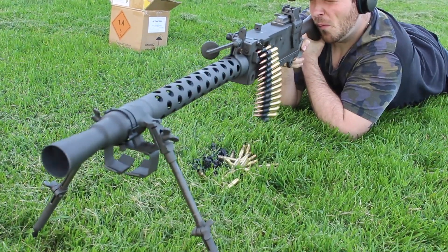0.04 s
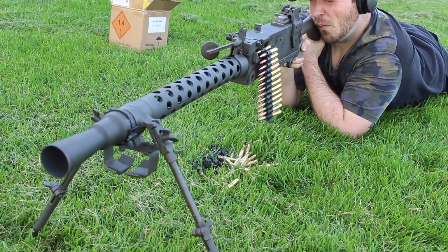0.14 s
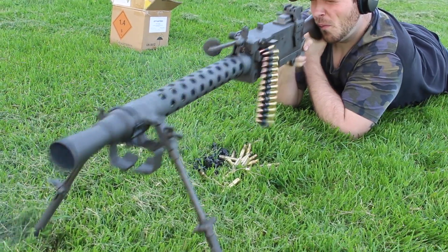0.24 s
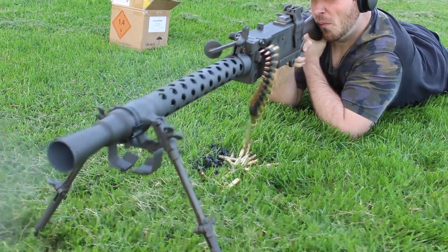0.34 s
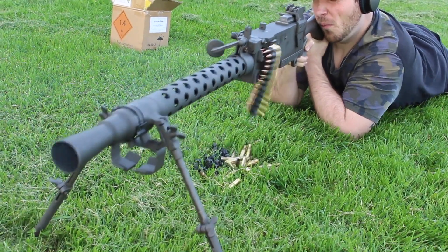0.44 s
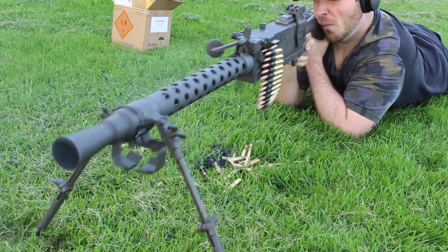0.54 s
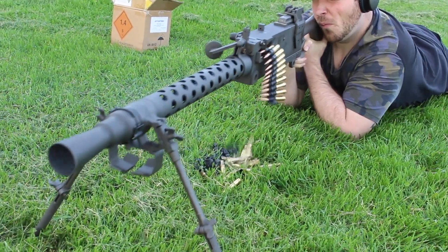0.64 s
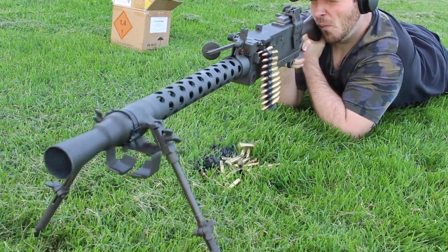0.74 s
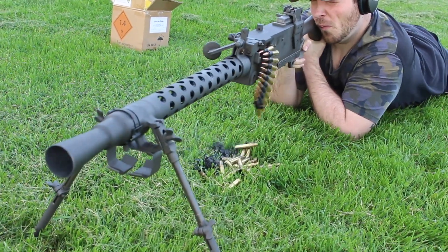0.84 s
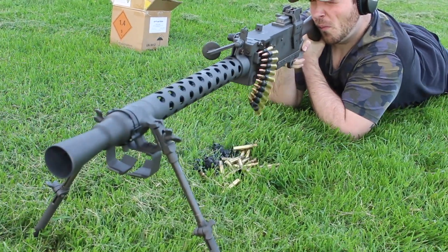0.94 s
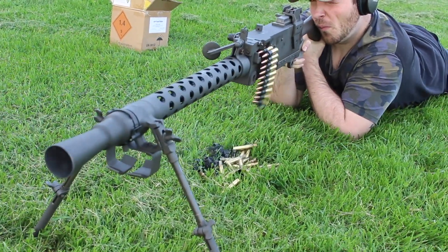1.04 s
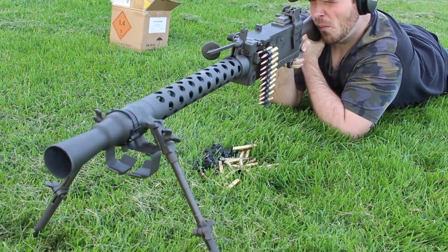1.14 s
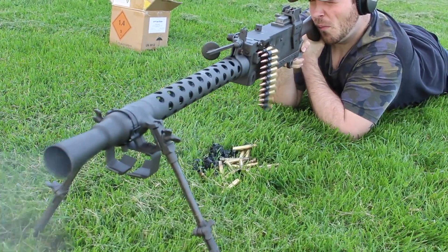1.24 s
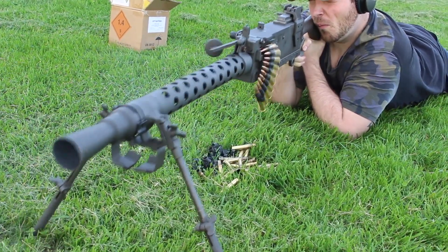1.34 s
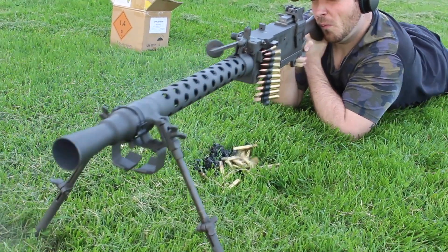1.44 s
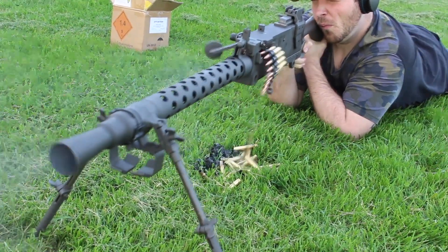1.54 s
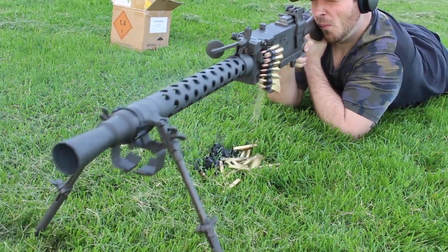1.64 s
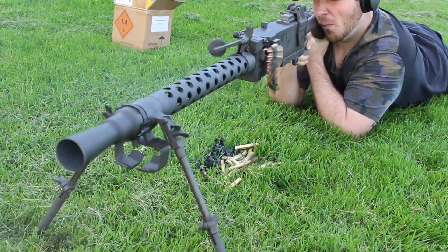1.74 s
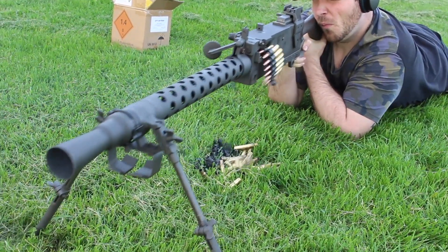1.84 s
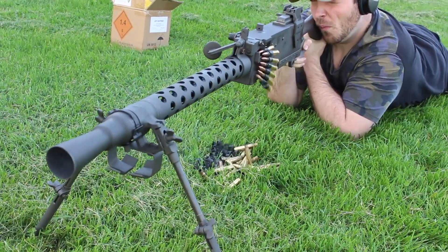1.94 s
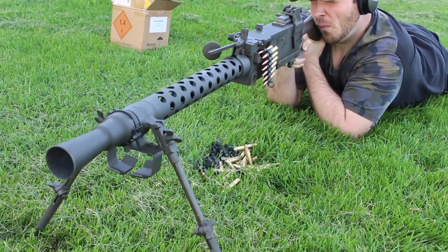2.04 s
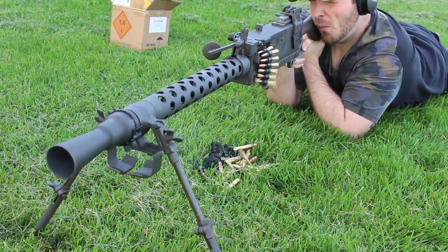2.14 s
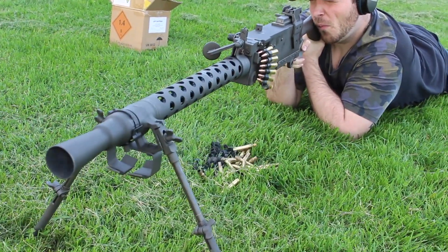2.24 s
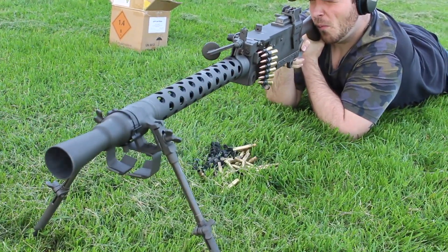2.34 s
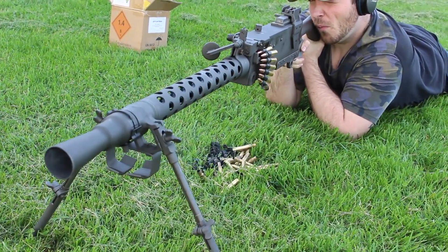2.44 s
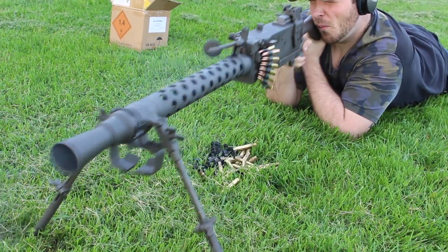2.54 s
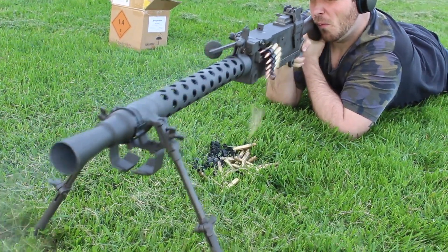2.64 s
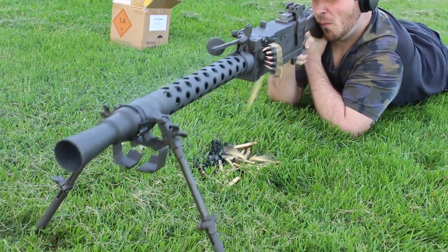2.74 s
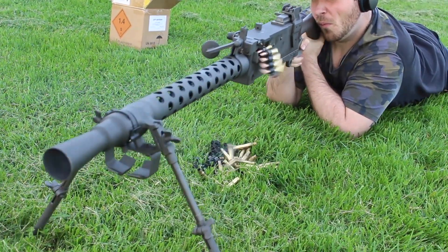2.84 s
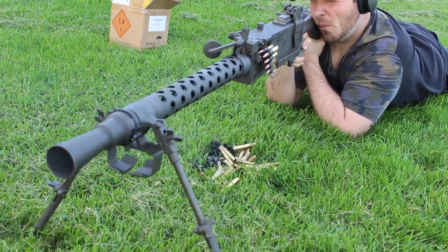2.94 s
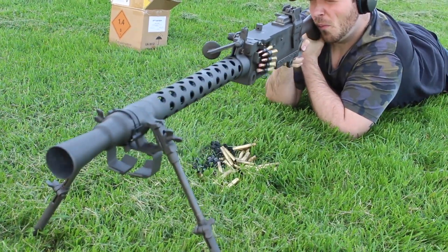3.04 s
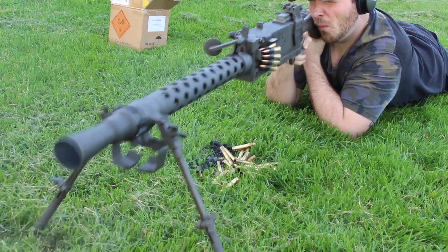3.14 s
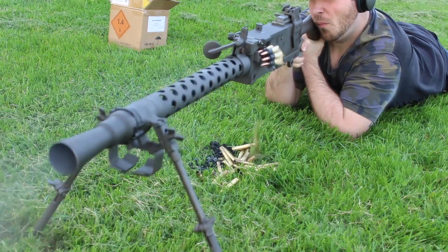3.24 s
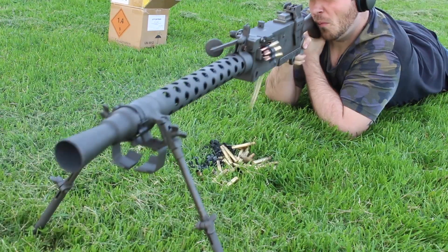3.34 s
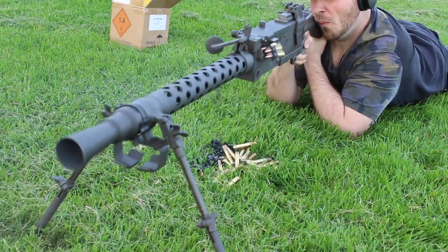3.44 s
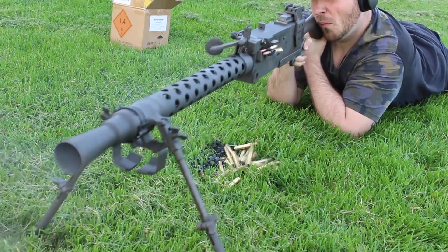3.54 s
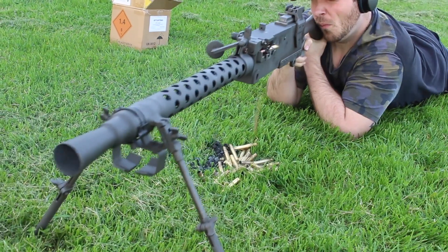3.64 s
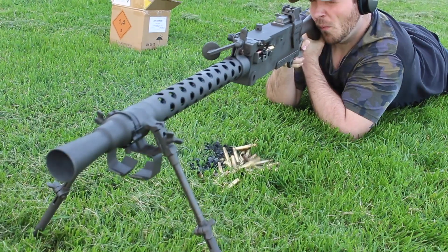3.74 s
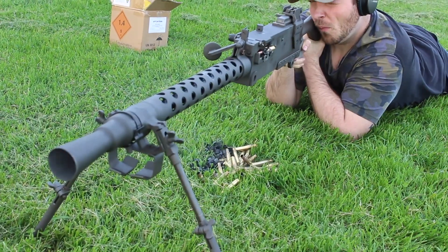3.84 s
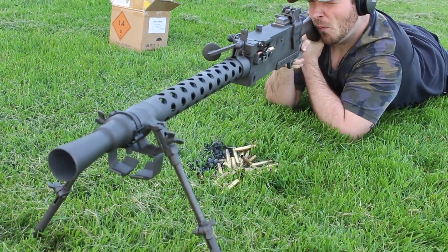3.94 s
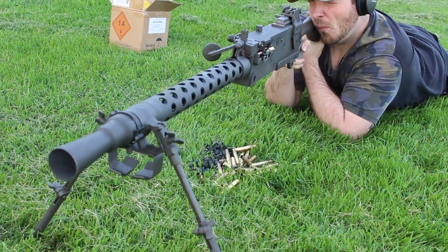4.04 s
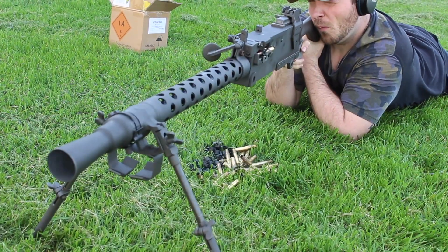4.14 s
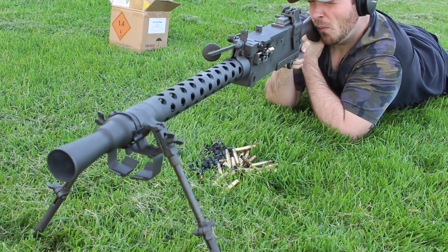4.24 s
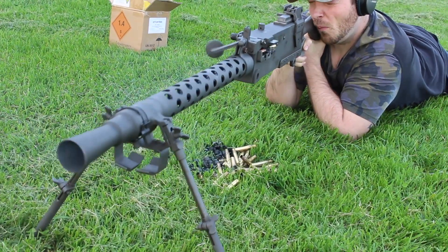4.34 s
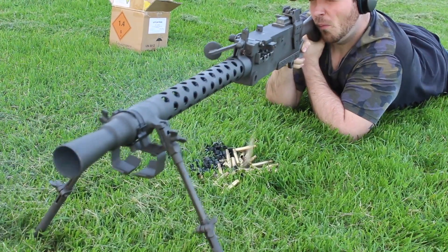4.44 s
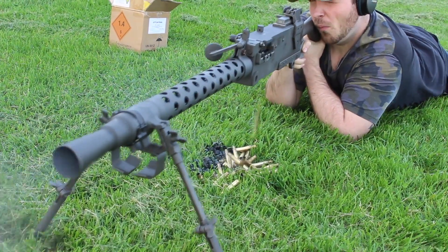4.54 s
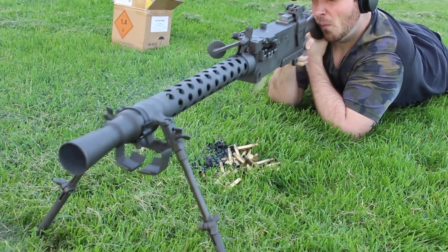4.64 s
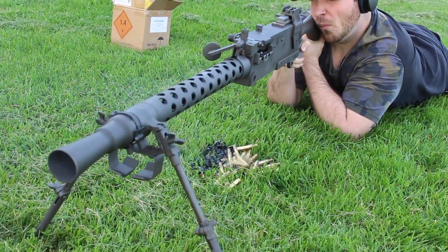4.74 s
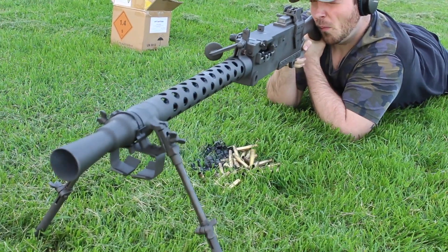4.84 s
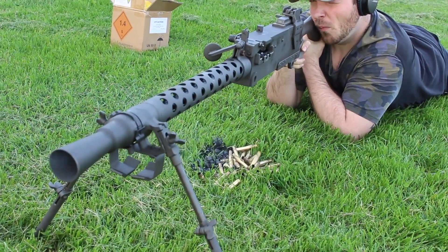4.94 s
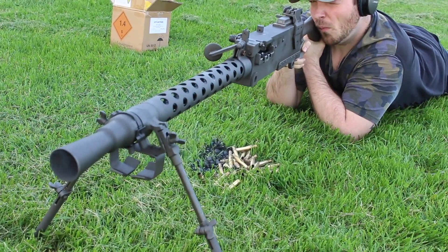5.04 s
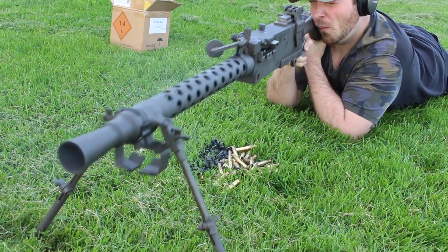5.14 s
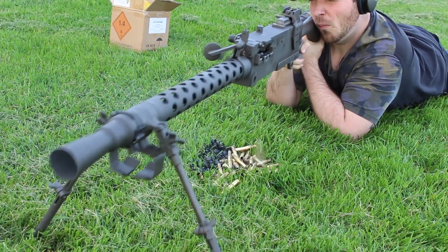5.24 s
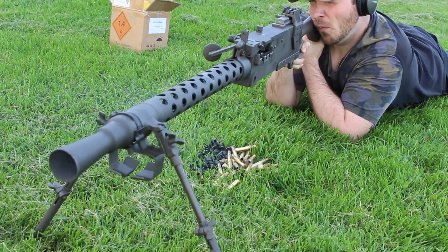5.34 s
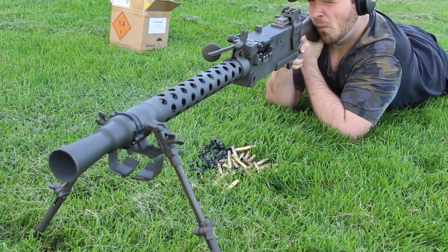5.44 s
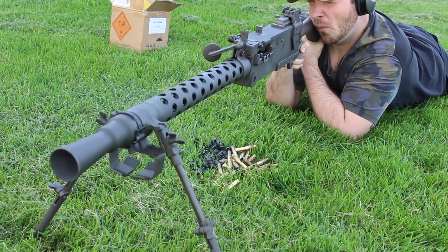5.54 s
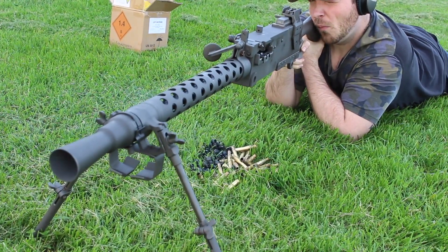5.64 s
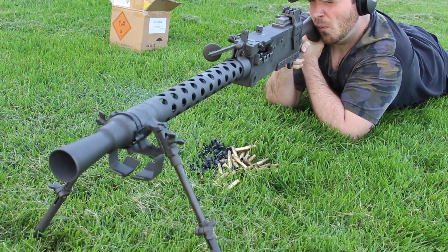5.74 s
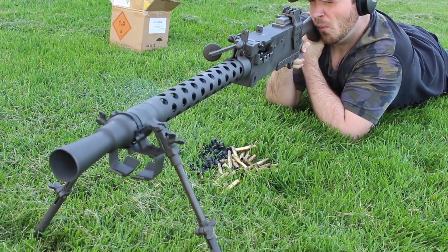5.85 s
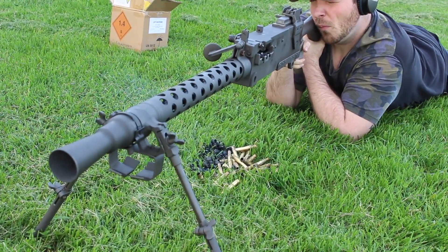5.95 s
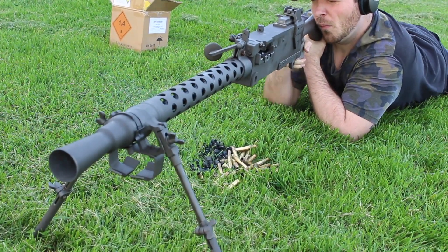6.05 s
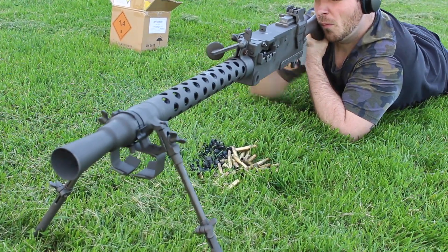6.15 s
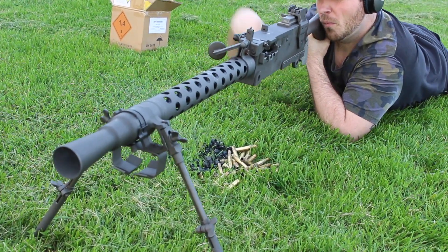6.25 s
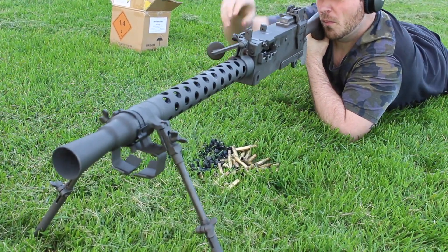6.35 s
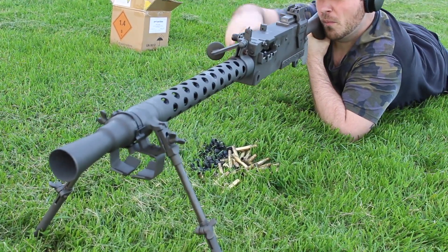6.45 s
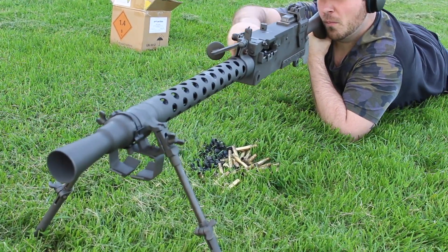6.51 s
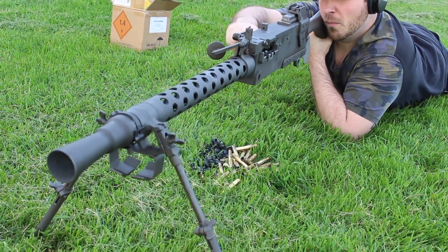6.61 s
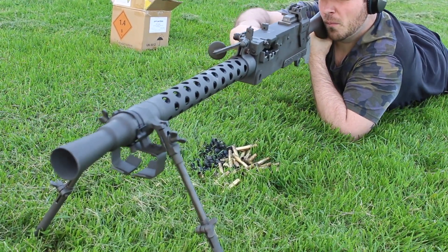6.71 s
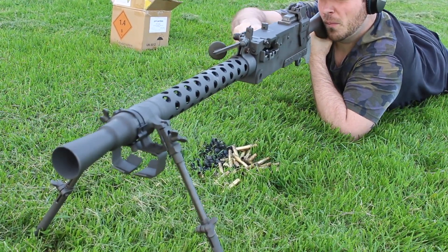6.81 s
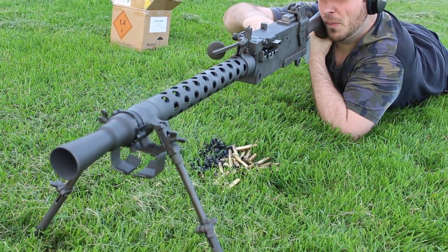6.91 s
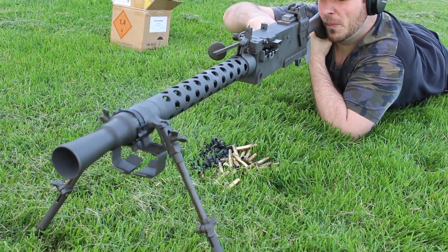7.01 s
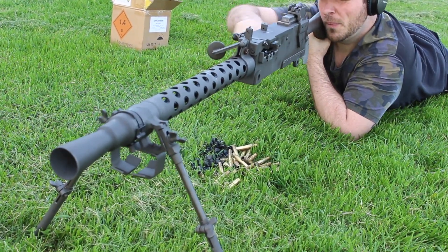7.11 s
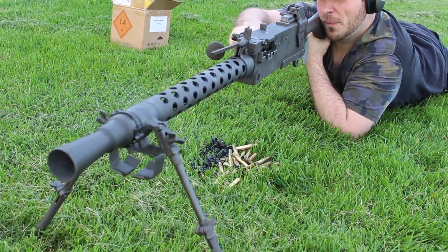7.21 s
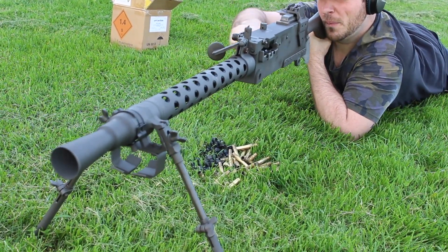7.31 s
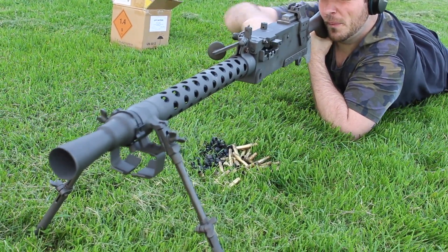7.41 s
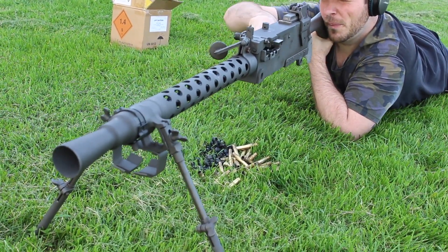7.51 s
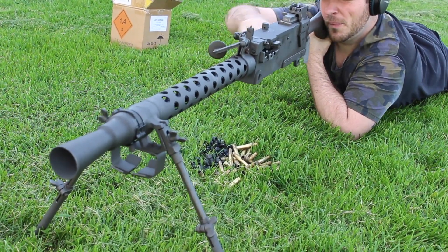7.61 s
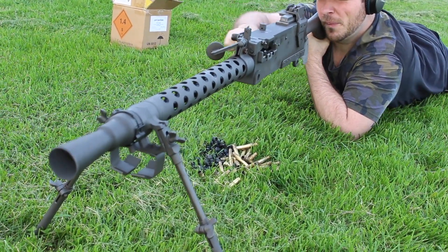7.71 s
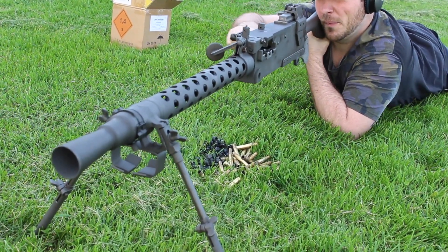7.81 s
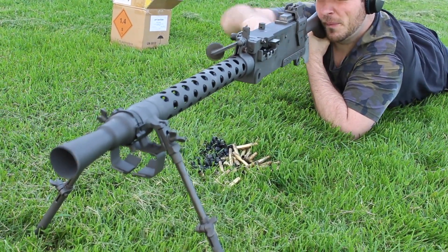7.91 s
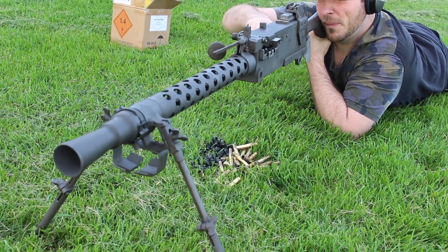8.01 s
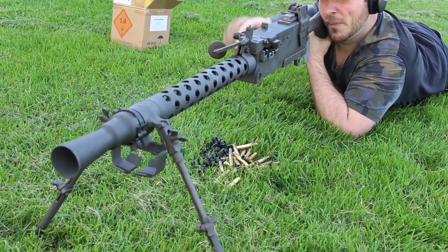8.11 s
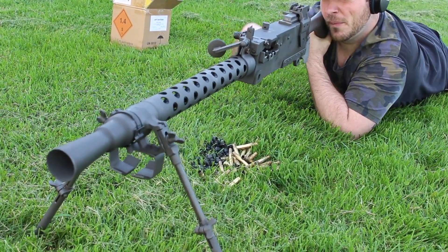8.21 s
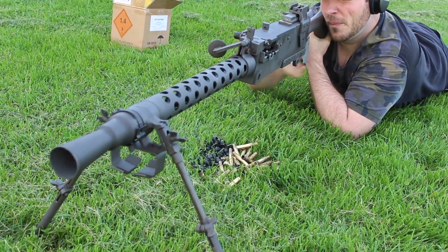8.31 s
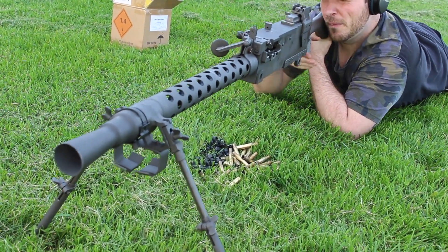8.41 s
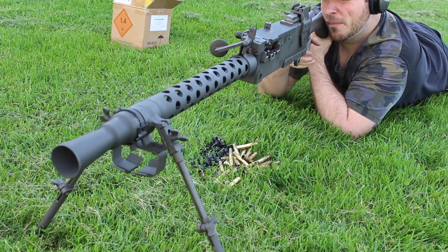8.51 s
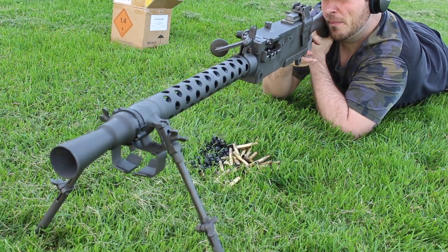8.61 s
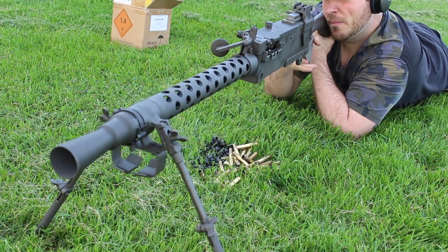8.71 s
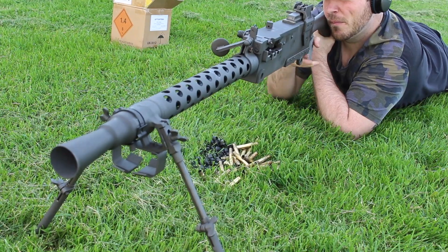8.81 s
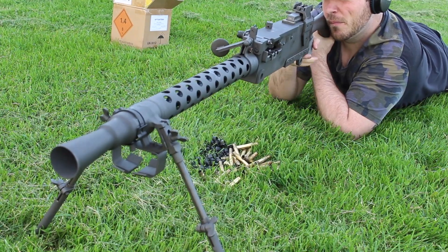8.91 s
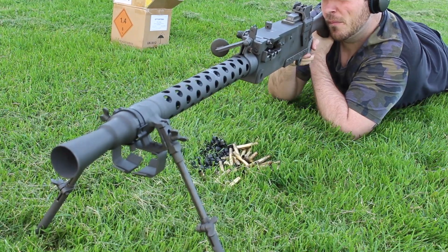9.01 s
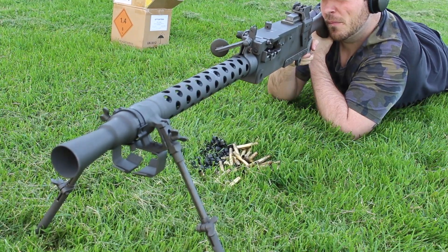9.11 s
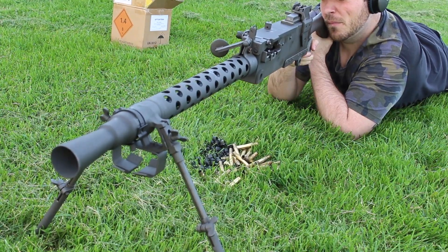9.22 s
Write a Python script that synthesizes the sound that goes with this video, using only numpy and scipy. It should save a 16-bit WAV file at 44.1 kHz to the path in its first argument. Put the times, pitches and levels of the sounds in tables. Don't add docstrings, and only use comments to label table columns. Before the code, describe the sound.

Open grass range, with a small microphone about two metres from a belt-fed machine gun. Earlier shots still echo at the start. Three blasts hit at 0.3-0.6 s, four at 1.35-1.8, two at 2.6-2.75, four at 3.2-3.6, three at 4.4-4.65, and one last at 5.2. Each is a harsh, clipped crack that briefly chokes the sound, followed by low ground thumps and rapid steel clatter. Between bursts, brass cases chime high and bright on a pile, the barrel jacket rings thinly near 4 kHz, and woods, bank and ridges roar back. From 5.5 the echo decays; small knocks and wind rumble emerge around 6.2-6.8. The bolt is pulled and slammed at 6.9-7.25, 7.45-7.8 and 7.95-8.25, with scrapes, ratchety clicks and ringing steel. Faint bird chirps come at 8.5, 8.8 and 9.1 over rising wind; a latch snaps at 9.25.

```python
import sys
import numpy as np
from scipy import signal
from scipy.io import wavfile
from scipy.ndimage import uniform_filter1d, map_coordinates

SR = 44100
rng = np.random.default_rng(int(sys.argv[2]) if len(sys.argv) > 2 else 0)


def unload_wav(signal):
    wavfile.write(
        sys.argv[1],
        SR,
        np.round(np.clip(np.atleast_2d(signal).T, -1, 1) * 32767).astype(np.int16),
    )


def gain_from_db(level_db):
    decades = np.asarray(level_db, float) / 20
    return 10 ** decades


N = 408807
TIME = np.arange(N) / SR

# (frequency [Hz], level [dB per Hz])
WOODS_COLOUR = [(210, -20), (350, -24.5), (556, -13), (1110, 2.5), (2050, 2.5), (2520, 1.5), (3150, 3),
                (3870, -4), (4000, -7.5), (4600, -18.5), (5980, -24.5), (10100, -120)]
TREBLE_COLOUR = [(3500, -120), (4200, 7), (6000, -6), (9000, -15.5), (16000, -31.5)]
RUMBLE_COLOUR = [(60, -41.5), (100, 7.5), (240, -1.5), (420, -26), (800, -19.5), (2500, -39), (6000, -70)]
BUFFET_COLOUR = [(15, -30), (30, -6), (60, -10.5), (100, -7.5), (160, -30)]
# (time [s], level [dB])
WIND = [(0, -44.5), (1, -41.5), (2.3, -57), (3.2, -40.5), (4.2, -50.5), (5.6, -50.5), (6.2, -33.5),
        (6.7, -26), (6.92, -35), (7.65, -37), (8.24, -45), (8.5, -35.5), (8.8, -31), (9.27, -28.5)]
LEAVES_DB, HISS_DB, RUMBLE_DB = -57.5, -77.5, -3.5
LEAVES_GROW = 1
EARLIER_SHOTS = [-.62, -.48, -.34]
# (end of burst [s], level [dB])
CARRY = [(-.3, 3.5), (.65, 3.5), (1.8, 0.5), (2.8, 4), (3.65, -4.5), (4.7, -1.5), (5.25, -2.5)]
# (delay [s], level [dB])
RIDGES = [
    (.8, -6),
    (.9, -9),
    (1.25, -14.5),
]
# (level [dB], delay [s], rise [s], t60 [s], extra loss from the ridges [dB])
ROAR_ECHO = (-25, 0.2749, 0.08, 2.5, -1)
TREBLE_ECHO = (-35, -0.02, -0.2, 2, -15)
RUMBLE_ECHO = (-26, 0.3, 0, 3, -4)
RIDGE_RISE_S = 0.055
WOODS_DEPTH_S, BEYOND_DB = .25, -5.5

# (time [s], length [s], start frequency [Hz], end frequency [Hz], level [dB])
BIRD = [
    (8.477, .03, 2950, 3100, -48),
    (8.835, .04, 3300, 2700, -52),
    (9.135, .065, 2850, 2400, -54),
]

# (time [s], level [dB])
JACKET_BLOWS = [(-.34, -19), (.6, -17.5), (1.776, -18.5), (2.757, -25), (3.62, -29), (4.66, -24),
                (5.2, -27.5), (6.917, -53), (7.008, -33), (7.256, -30), (7.532, -32), (7.771, -38),
                (8.02, -28), (8.253, -37)]
JACKET_HZ, JACKET_RISE_S, JACKET_T60 = 4064, 0.13, 2

# (time [s], level [dB], mouth mode [Hz], wall mode level [dB])
CASES = [(.7462, -22, 14400, -27), (.833, -26, 13800, -26), (1.1144, -13.5, 13600, -26),
         (1.18, -24, 12400, -45), (1.6864, -46.5, 12300, -24.5), (1.9415, -22.5, 12900, -22.5),
         (1.9994, -24, 12600, -30), (2.045, -21.5, 14000, -40), (2.282, -26, 13700, -26.5),
         (2.9044, -35, 14400, -28), (2.9577, -27.5, 14300, -21.5), (3.025, -26, 14500, -24),
         (3.1682, -17.5, 14100, -40.5), (3.8023, -19, 14500, -21.5), (3.8831, -22.5, 14200, -45),
         (4.1594, -33, 14000, -35), (4.8334, -23, 14300, -20), (4.9706, -22.5, 13300, -45.5),
         (5.3664, -29.5, 14600, -25.5), (5.456, -33, 14300, -31)]
# (frequency [Hz], level [dB])
BRASS = [(5512, -4.5), (6901, -9.5), (7547, -3.5), (9430, -17), (9900, -1), (12470, -9), (12970, -30),
         (13380, -15), (13980, -10), (14500, -12.5)]
BODY_HZ, BODY_PER_MOUTH, BODY_DB, BODY_GROWS = 7250, 0.39, -27.5, 0.52
# (time [s], level [dB])
CLEAR_CASES = [(.88, -31.5), (1.0902, -21.5), (2.229, -28), (3.0525, -28.5), (4.0756, -33)]
# (frequency [Hz], level [dB], t60 [s])
CLEAR_MODES = [
    [(7537, -12, 4.4), (8969, -8, 0.07), (9600, -7.5, 5.0), (9808, -31, 5.0), (12530, -6, 0.36),
     (12940, -15, 0.31), (13360, -2, 0.29), (13520, -3, 0.53), (13600, -17, 1.0)],
    [(5512, -12, 0.18), (6900, -23, 0.37), (7260, -12.5, 0.56), (7547, -23, 0.58), (9426, -50, 0.4),
     (10000, -10, 0.18), (12470, 1, 0.14), (12600, -69.5, 5.0), (12970, -29, 2.4), (13100, -18.5, 0.91),
     (13980, -56.5, 5.0), (14590, -6.5, 0.047)],
    [(7100, -19, 0.51), (7620, -15, 5.0), (9065, -32, 5.0), (9275, -21, 0.63), (9800, -19, 0.62),
     (9868, -63, 5.0), (12610, -7, 0.3), (13500, -11, 0.46), (13740, -4, 0.28), (14140, -8, 0.34)],
    [(7913, -14, 0.34), (9426, -27.5, 0.34), (9840, -6, 0.18), (9760, -23.5, 0.36), (9895, 0.5, 0.28),
     (12600, -10.5, 0.27), (14360, -13.5, 0.36), (14590, -18, 0.21)],
    [(5502, -21, 5.0), (7250, -20.5, 5.0), (7730, -19, 5.0), (9071, -16, 0.41), (9254, -23, 5.0),
     (9889, -19.5, 5.0), (12540, -6, 1.5), (12730, 0.5, 0.15), (13620, -7.5, 0.38), (14200, -1.5, 0.33)],
]
CLEAR_LASTS_S = .2

# (grip [s], unlock [s], rear stop [s], gap between feed teeth [s], settling delay [s])
PULLS = [
    (6.893, 6.917, 7.0075, .015, .078),
    (7.454, 7.476, 7.531, .012, .059),
    (7.952, 7.974, 8.019, .01, .074),
]
# (let go [s], catch [s], slam [s], rebound [s])
RELEASES = [
    (7.181, 7.217, 7.256, 7.278),
    (7.697, 7.736, 7.771, 7.792),
    (8.193, 8.208, 8.253, 8.269),
]
# (first pull [dB], second pull [dB], third pull [dB], treble [dB], frequency [Hz])
PULL_CONTACTS = [(-7.5, -2, -4, -25.5, 1970), (-11, -23.5, -13, -20, 2400), (-1, -4.5, -7, -13, 2700),
                 (-18, -14, -17, -15, 2300), (-11, -14.5, -17, -20, 2000), (-11.5, -14, -13.5, -14, 3000),
                 (-5.5, -5, -1.5, -24.5, 1400), (-2.5, 0.5, -2, -17.5, 3050), (-17, -24, -16, -23, 2040),
                 (-41, -38, -28.5, -15, 3600), (-41, -33, -34, -16, 3600)]
# (first release [dB], second release [dB], third release [dB], treble [dB], frequency [Hz])
RELEASE_CONTACTS = [(-26, -22.5, -27, -13, 2000), (-12, -17, -21, -7, 2980), (-13, -30, -27, -18, 2600),
                    (-11.5, -15, -24, -15, 2160), (-5, -10.5, -12.5, -12.5, 4500),
                    (-9, -6, -7.5, -13, 2100), (-1.5, -2.5, 0, -15.5, 2900), (-8, -13.5, -6.5, -15, 2400),
                    (-8, -8, -8.5, -12.5, 2770), (-42, -37, -40, -22, 5100), (-40, -38, -40, -22, 5000),
                    (-58, -36, -58, -30, 1800)]
# (time [s], level [dB], treble [dB], frequency [Hz])
FUMBLE = [(6.883, -8.5, -27, 2240), (6.888, -13, -22, 2100), (6.908, -6, -13, 2700),
          (6.925, -14, -32, 2500), (6.934, -15, -34, 2500), (6.96, -17, -20, 2200), (7.063, -34, -28, 2500),
          (7.159, -34, -22, 3200), (7.391, -38, -30, 1500)]
# (time [s], level [dB], treble [dB], frequency [Hz])
STRAY_KNOCKS = [(0.748, -2, -20, 3460), (1.901, -6, -25, 3020), (1.917, -5, -15, 1900),
                (2.8903, -23, -21, 3000), (3.746, -5, -12, 2980), (5.331, -2, -9, 3040),
                (5.855, -33.5, -8, 7450), (6.228, -33, -14, 3000), (6.2587, -7.5, -32, 2900),
                (6.534, -6.5, -28, 2940), (6.7477, -13, -29, 1500), (8.504, -14, -38, 3030),
                (8.574, -18.5, -40, 2600), (8.6494, -38, -33, 3000), (8.9062, -30, -25, 2500),
                (9.213, -21, -22, 1500), (9.2533, 12, -11.5, 3240), (9.2508, 4, -17.5, 2930),
                (9.2614, -2, -5, 2300)]
REBOUND_S, SETTLE_GAP_S, RUB_S = .016, .015, .006
FOLLOW_S = (.011, .008)
CHAMBER_S, AFTER_SLAM_S = (.021, .014, .008), (.079, .095, .12)
SCRAPE_DB = (-39, -25.5)
RUB_DB, RUB_LENGTH_S = (-56.5, -30), 0.027
HAND_S, HAND_DB = (6.8, 8.45), (-56, -73)
# (frequency [Hz], level [dB per Hz])
RECEIVER_COLOUR = [(150, -50.5), (250, -16.5), (501, -15), (598, -10.5), (705, -12.5), (991, -1),
                   (2180, -4), (2370, -17), (3160, -4), (3670, -3.5), (3980, -11.5), (4500, -12.5),
                   (6500, -18.5), (8450, -51), (14300, -120)]
SPARK_COLOUR = [(4500, -20), (6000, 4.5), (10000, 0), (15500, -3.5)]
FOCUS, BROAD_DB = 3.5, -8
# (frequency [Hz], level [dB], t60 [s])
STEEL_MODES = [(1150, -1, 0.43), (1604, -7, 0.35), (2466, 0, 0.89), (2600, -5.5, 0.57), (3410, -4.5, 0.29),
               (3634, -15, .6), (5460, -9, .3), (6600, -6, 0.88), (8655, -10.5, .9), (9990, 0.5, .25)]
# (receiver [dB], side plate [dB], cover [dB], jacket knock [dB])
UNLOCK_RING, REAR_RING = (-48, -61, -56, -10.5), (-35, -52, -55.5, -35.5)
SLAM_RING, LATCH_RING = (-53, -41, -52, 1), (-38, -42, -36, 1)
SETTLE_RING = (-58, -61, -66, -26.5)
LATCH_S = 9.255
TIRING_DB = 6

SHOTS = [.3143, .4508, .5988, 1.3532, 1.4906, 1.6365, 1.7758, 2.6224, 2.7565, 3.2054, 3.3519, 3.4853, 3.62,
         4.3858, 4.5245, 4.6595, 5.2016]
# (delay [s], level [dB], rise [s], t60 [s])
CYCLE = [(-.003, -21.5, .001, .03), (0.0119, -13.5, 0.0017, 0.049), (.028, -14.5, .001, 0.015),
         (.038, -21.5, 0.0015, 0.065), (.053, -15, .0006, 0.023), (0.0743, -17.5, 0.00021, 0.089),
         (.097, -34, .002, .04), (0.114, -18.5, 0.0044, 0.075), (.13, -15, 0.0026, 0.042),
         (.135, -33.5, .01, 0.29)]
# (frequency [Hz], level [dB per Hz])
ACTION_COLOUR = [(290, -20.5), (500, 7), (1230, -2), (4030, 1.5), (4660, -10.5), (5550, -8), (6610, -17),
                 (7100, -15), (11100, -19.5), (16000, -27)]
# (delay [s], level [dB], polarity, start [Hz], end [Hz], length [s])
RETURNS = [(.0394, -.5, -1, 425, 110, .0123), (.0525, -20, 1, 260, 200, .024),
           (.0557, -15, 1, 300, 200, .008), (.0766, -5, 1, 370, 300, .0033),
           (.0798, -17, 1, 480, 420, .005), (.0845, -15, 1, 330, 250, .005),
           (.097, -21, -1, 300, 200, .008)]
# (time [s], level [dB])
BANK = [(0.844, -17.5), (2.022, -18), (3.004, -18), (3.863, -19.5), (4.905, -17), (5.452, -19.5)]
# (frequency [Hz], level [dB per Hz])
BANK_COLOUR = [(180, -53), (300, -31), (1210, -3), (1460, -45), (2080, 3.5), (2540, -10), (2880, 2.5),
               (9000, -34.5), (11700, -56), (19800, -120)]
THUMP_COLOUR = [(90, -30), (150, -4), (220, 0), (310, -6), (420, -2), (520, -18), (1200, -40)]
BLAST_COLOUR = [(200, -14), (800, -3), (1600, -5), (3500, 0), (9000, -10), (16000, -18)]
THUMP_DB, THUMP_T60 = -21, .25
LEAD_IN_S, LEAD_IN_DB = 0.0017, (-34, -12)


def curve(rows, column):
    rows = np.array(rows)
    return np.interp(TIME, rows[:, 0], rows[:, column])


def noise(spectrum, patchy_db=0.):
    hz, _, z = signal.stft(rng.standard_normal(N + 512), SR, nperseg=512)
    field = uniform_filter1d(rng.standard_normal(z.shape), size=6, axis=0)
    field = uniform_filter1d(field, size=8, axis=1)
    f, db = np.transpose(spectrum)
    colour = np.interp(np.log(hz + 1), np.log(f), db, left=-120, right=-120)
    gain = gain_from_db(colour[:, None] + patchy_db * field / field.std())
    x = signal.istft(z * gain, SR, nperseg=512)[1][:N]
    return x / x.std()


def wobble(rate):
    return map_coordinates(rng.standard_normal(int(N * rate / SR) + 4), [TIME * rate])


def add(track, s, piece):
    part = track[round(s * SR):][:len(piece)]
    part += piece[:len(part)]


def strike(db, rise, t60, length=.3):
    t = np.arange(round(length * SR)) / SR
    return gain_from_db(db - 60 * t / max(t60, .003)) * (1 - np.exp(-t / max(rise, 1e-4))) ** 2


def since_shot():
    starts = np.array([-9] + SHOTS)
    return TIME - starts[np.searchsorted(starts, TIME, side="right") - 1]


def echo(db, delay, rise, t60, far_db):
    power = np.zeros(N + SR)
    ends, carry_db = np.transpose(CARRY)
    near = strike(db, rise, t60, length=2.5) ** 2
    far = strike(db + far_db, RIDGE_RISE_S, t60, length=2.5) ** 2
    beyond = np.clip((TIME[:len(near)] - WOODS_DEPTH_S) / .03, 0, 1)
    near = near * gain_from_db(2 * BEYOND_DB * beyond)
    for s in EARLIER_SHOTS + SHOTS:
        gain_db = carry_db[min(np.searchsorted(ends, s), len(ends) - 1)]
        add(power, s + 1 + abs(delay), gain_from_db(2 * gain_db) * near)
        for late, ridge_db in RIDGES:
            add(power, s + 1 + late, gain_from_db(2 * (gain_db + ridge_db)) * far)
    return np.sqrt(power[SR:])


def air():
    lumps, wind_db = wobble(40), curve(WIND, column=1)
    stirred = gain_from_db(LEAVES_GROW * (wind_db - wind_db[-1]))
    roar = np.hypot(echo(*ROAR_ECHO), gain_from_db(LEAVES_DB) * stirred)
    roar = roar * gain_from_db(1.1 * lumps) * noise(WOODS_COLOUR, patchy_db=.8)
    treble = np.hypot(echo(*TREBLE_ECHO), gain_from_db(HISS_DB) * stirred)
    treble = treble * gain_from_db(0.73 * lumps) * noise(TREBLE_COLOUR, patchy_db=-2.0)
    rumble = np.hypot(echo(*RUMBLE_ECHO), gain_from_db(wind_db + RUMBLE_DB))
    rumble = rumble * gain_from_db(2.5 * wobble(20)) * noise(RUMBLE_COLOUR, patchy_db=1.2)
    buffet = gain_from_db(wind_db + 4 * wobble(14)) * noise(BUFFET_COLOUR)
    hiss = gain_from_db(-63) * stirred * rng.standard_normal(N)
    return roar + treble + rumble + buffet + hiss


def bird():
    out = np.zeros(N)
    for s, length, start_hz, end_hz, db in BIRD:
        hz = np.linspace(start_hz, end_hz, round(length * SR))
        add(out, s, gain_from_db(db) * np.hanning(len(hz)) * np.sin(2 * np.pi * np.cumsum(hz) / SR))
    return out


def jacket():
    s, db = np.transpose(JACKET_BLOWS)
    latest = np.searchsorted(s, TIME, side="right") - 1
    t = TIME - s[latest]
    level = gain_from_db(db[latest] - 60 * t / JACKET_T60 + wobble(23)) * (1 - np.exp(-t / JACKET_RISE_S)) ** 2
    phase = 2 * np.pi * np.cumsum(JACKET_HZ + 4 * wobble(27)) / SR
    return np.sqrt(2) * level * np.sin(phase)


def cases():
    out, t = np.zeros(N), np.arange(round(.3 * SR)) / SR
    rattle = wobble(160)
    for s, mouth_db, mouth_hz, wall_db in CASES:
        body_hz = BODY_HZ + BODY_PER_MOUTH * (mouth_hz - 12500)
        body_db = BODY_DB + BODY_GROWS * mouth_db
        upset = .7 * rattle[round(s * SR):][:len(t)]
        modes = BRASS + [(mouth_hz, 0), (body_hz, 0)]
        chances = rng.standard_normal((len(modes), 4))
        for (hz, level_db), (a, b, c, d) in zip(modes, chances):
            group_db = mouth_db - 12.0 if hz > 11000 else wall_db - 4.0 if hz > 9000 else body_db
            chance_db = 0 if level_db == 0 else 4.1 * a
            grass = 1 + (t / (0.17 * np.exp(0.4 * c))) ** 4
            damping = gain_from_db(-60 * t / 0.42) / (1 + 0.0046 / (t + 1e-5)) / grass
            tumble = gain_from_db(-14 * ((t * (16 + 5 * d) + a) % 1) * min(abs(c), 1))
            tone = np.sin(2 * np.pi * hz * (1 + 0.0064 * b) * t + upset * np.sign(d))
            add(out, s, gain_from_db(group_db + level_db + chance_db) * damping * tumble * tone)
        click = np.diff(rng.standard_normal(len(t) + 1))
        add(out, s, strike(mouth_db - 14, .0006, 0.025) * click)
    return out * gain_from_db(1.4 * wobble(110))


def clear_cases():
    out, t = np.zeros(N), TIME[:round(.35 * SR)]
    for (s, db), modes in zip(CLEAR_CASES, CLEAR_MODES):
        ring = sum(gain_from_db(level_db - 60 * t / np.clip(1.3 * t60, .1, .9)) * np.sin(2 * np.pi * hz * t)
                   for hz, level_db, t60 in modes)
        click = strike(db - 7.5, .0006, .03, length=.35) * np.diff(rng.standard_normal(len(t) + 1))
        add(out, s, gain_from_db(db) * ring / (1 + (t / CLEAR_LASTS_S) ** 6) + click)
    return out * gain_from_db(2 * wobble(90))


def contacts():
    rows = list(FUMBLE)
    for k, (grip, unlock, stop, tooth, settle) in enumerate(PULLS):
        teeth = stop + .0015 - tooth * np.arange(3, 0, -1)
        times = [grip, grip + FOLLOW_S[0], unlock, *teeth, stop - .001, stop, stop + REBOUND_S,
                 stop + settle, stop + settle + SETTLE_GAP_S]
        rows += [(s, row[k], *row[3:]) for s, row in zip(times, PULL_CONTACTS)]
    for k, (let_go, catch, slam, rebound) in enumerate(RELEASES):
        times = [let_go - RUB_S, let_go, catch, *(slam - np.array(CHAMBER_S)), slam, slam + FOLLOW_S[1],
                 rebound, *(slam + np.array(AFTER_SLAM_S))]
        rows += [(s, row[k], *row[3:]) for s, row in zip(times, RELEASE_CONTACTS)]
    return rows


def stops():
    unlocks = [(row[1], *UNLOCK_RING) for row in PULLS]
    rears = [(row[2], *REAR_RING) for row in PULLS]
    tiring = TIRING_DB * np.array([1, 1, 1, 0])
    slams = [(row[2], *(np.array(SLAM_RING) - k * tiring)) for k, row in enumerate(RELEASES)]
    settles = [(row[2] + late, *SETTLE_RING) for row in RELEASES for late in AFTER_SLAM_S[:2]]
    return unlocks + rears + slams + [(LATCH_S, *LATCH_RING)], settles


def steel_ring():
    ring, t, knock_t = np.zeros(N), TIME[:SR // 2], TIME[:round(.3 * SR)]
    hard, soft = stops()
    for s, receiver_db, plate_db, cover_db, knock_db in hard + soft:
        for (hz, db, t60), chance in zip(STEEL_MODES, rng.standard_normal(len(STEEL_MODES))):
            part_db = plate_db if 2000 < hz < 3000 else receiver_db if hz < 4000 else cover_db
            add(ring, s, gain_from_db(part_db + db + 1.5 * chance - 60 * t / t60) * np.sin(2 * np.pi * hz * t))
        add(ring, s - .002, strike(knock_db, 0.002, 0.04) * np.sin(2 * np.pi * JACKET_HZ * knock_t))
    return gain_from_db(3.1 * wobble(37)) * ring


def handling():
    struck, body, bright = np.zeros(N), np.zeros(N), np.zeros(N)
    strays = [(s, db - 13.0, *rest) for s, db, *rest in STRAY_KNOCKS]
    for s, db, treble_db, hz in contacts() + strays:
        peak = signal.iirpeak(hz, FOCUS, SR)
        part = signal.lfilter(*peak, rng.standard_normal(round(.3 * SR)))
        part = signal.lfilter(*peak, part)
        level = strike(db + 6.5, 0.0013, 0.017) + strike(db - 10, 0.005, 0.063)
        add(struck, s - .0012, level * part / part.std())
        add(body, s - .0012, gain_from_db(BROAD_DB) * level)
        spark_db = db + treble_db
        spark = strike(spark_db + 5.5, 0.00091, 0.016) + strike(spark_db - 11.0, 0.0042, 0.064)
        add(bright, s - .0015, spark)
    rub = gain_from_db(np.linspace(*RUB_DB, round(RUB_LENGTH_S * SR)))
    for s in [FUMBLE[0][0]] + [row[0] for row in PULLS[1:] + RELEASES]:
        add(body, s - RUB_LENGTH_S, rub)
        add(bright, s - RUB_LENGTH_S, gain_from_db(-17) * rub)
    for let_go, catch, slam, rebound in RELEASES:
        scrape_db = np.linspace(*SCRAPE_DB, round((slam - let_go) * SR))
        add(body, let_go, gain_from_db(scrape_db))
        add(bright, let_go, gain_from_db(scrape_db - 14.0))
    hand = (TIME > HAND_S[0]) * (TIME < HAND_S[1]) * gain_from_db(2.4 * wobble(25))
    body = (body + gain_from_db(HAND_DB[0]) * hand) * noise(RECEIVER_COLOUR, patchy_db=0.5)
    bright = (bright + gain_from_db(HAND_DB[1]) * hand) * noise(SPARK_COLOUR)
    grit = gain_from_db(2.1 * wobble(300))
    return grit * (struck + body + bright) + steel_ring()


def action():
    level, drag = np.zeros(N), np.zeros(N)
    for s in SHOTS:
        add(drag, s + .113, strike(-17, .008, 0.093))
        for delay, hit_db, rise, t60 in CYCLE:
            hit = strike(hit_db + rng.normal(0, 1.5), rise, t60)
            add(level, s + delay + rng.normal(0, .0006), hit)
    ring = noise([(3850, -40), (4060, 0), (4270, -40), (7100, -60), (7280, -13), (7450, -60)])
    return level * gain_from_db(2 * wobble(500)) * noise(ACTION_COLOUR, patchy_db=1.5) + drag * ring


def ground_returns():
    thumps, roll = np.zeros(N), np.zeros(N)
    for s in SHOTS:
        add(roll, s + .046, strike(THUMP_DB, 0.0031, THUMP_T60, length=0.067))
        for delay, level_db, polarity, start_hz, end_hz, length in RETURNS:
            length *= 1 + .04 * rng.standard_normal()
            u = np.arange(round(length * SR)) / (length * SR)
            phase = 2 * np.pi * length * (start_hz * u + (end_hz - start_hz) * u ** 2 / 2)
            level = polarity * gain_from_db(level_db + rng.normal(0, 1))
            wave = level * np.sin(np.pi * u ** .55) ** .9 * np.sin(phase)
            add(thumps, s + delay + rng.normal(0, .0002), .4 * np.tanh(wave / .4))
    return thumps + roll * noise(THUMP_COLOUR)


def bank_echo():
    whistles, swell, t = np.zeros(N), np.zeros(N), TIME[:round(.045 * SR)]
    for s, db in BANK:
        for late, octave, size in np.clip(rng.standard_normal((12, 3)), -1.5, 1.5):
            hz = 2900 * 2 ** (0.33 * octave) * (1 - 2.2 * t)
            level = gain_from_db(db - 9.5 + 3 * size - 3 * abs(octave)) * np.hanning(len(t))
            add(whistles, s - .02 + .02 * late, level * np.sin(2 * np.pi * np.cumsum(hz) / SR))
        swell += gain_from_db(db) * np.exp(-((TIME - s) / np.where(TIME < s, .025, .045)) ** 2)
    return whistles + swell * gain_from_db(3.5 * wobble(180) - 3) * noise(BANK_COLOUR, patchy_db=2)


def blasts():
    jet, push, t = np.zeros(N), np.zeros(N), np.arange(round(.05 * SR)) / SR
    for s in SHOTS:
        add(jet, s - LEAD_IN_S, gain_from_db(np.linspace(*LEAD_IN_DB, round(LEAD_IN_S * SR))))
        add(jet, s - .0001, strike(25, .0006, .029, length=.014) + strike(4, .003, 1, length=.014))
        front = 26 * np.sin(2 * np.pi * 790 * t + 1.85) * np.exp(-t / .0015)
        suction = -7.5 * np.sin(np.pi * np.clip(t / .014, 0, 1)) ** .6
        rebound = 0.26 * np.exp(-((t - .0175) / np.where(t < .0175, .003, .005)) ** 2)
        add(push, s, front + suction + rebound)
    return push + jet * gain_from_db(2.2 * wobble(900)) * noise(BLAST_COLOUR)


def scene():
    knocks = sum((TIME > row[0]) * np.exp(-np.abs(TIME - row[0]) / 0.057) for row in stops()[0])
    duck = gain_from_db(-11 * np.exp(-(since_shot() / 0.15) ** 2) - 19 * knocks)
    surroundings = duck * (air() + jacket())
    brass = cases() + clear_cases()
    gun = handling() + action() + ground_returns() + bank_echo() + blasts()
    return (surroundings + bird() + brass + gun)[None]


def low_pass(x):
    return signal.sosfilt(signal.butter(12, 16340, fs=SR, output="sos"), x)


def record(dry):
    t = since_shot()
    recovery = (np.minimum(t, 1) / .024) ** 8
    low = np.maximum(.06 - 1.2 * np.exp(-t / .0047) - recovery, -.99)
    high = np.minimum(.46 + .53 * np.exp(-t / .005) + recovery, .99)
    x = np.clip(dry, low, high)
    x = signal.sosfilt(signal.butter(N=1, Wn=14, btype="high", fs=SR, output="sos"), x)
    x = signal.sosfiltfilt(signal.butter(N=12, Wn=15500, fs=SR, output="sos"), x)
    return low_pass(x)


dry = scene()
out = record(dry)
unload_wav(out)
```